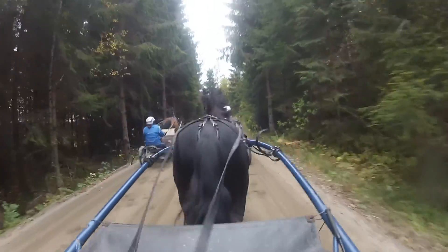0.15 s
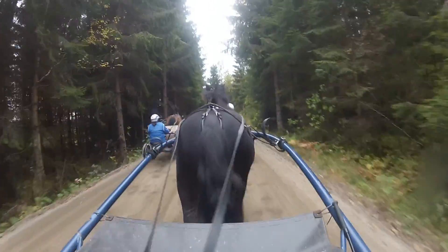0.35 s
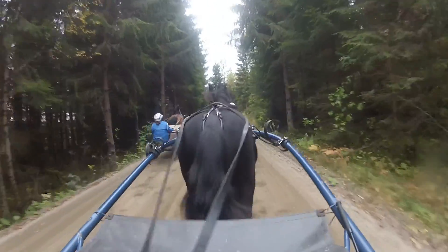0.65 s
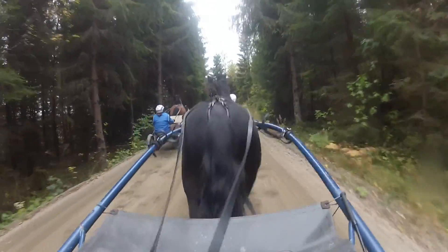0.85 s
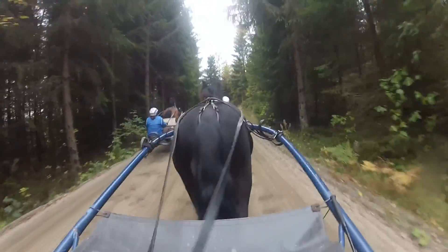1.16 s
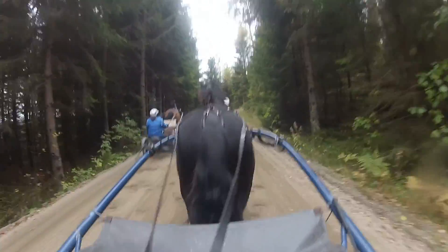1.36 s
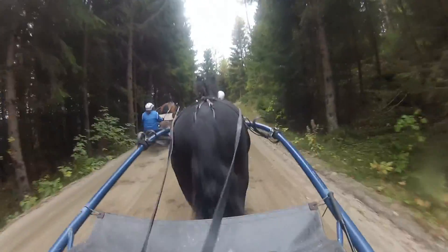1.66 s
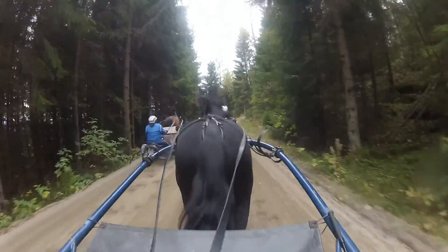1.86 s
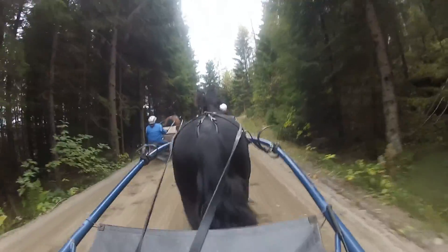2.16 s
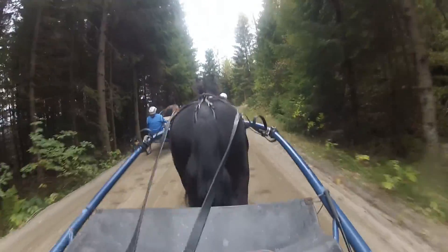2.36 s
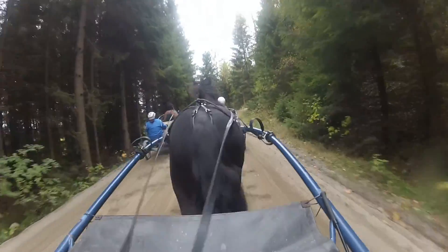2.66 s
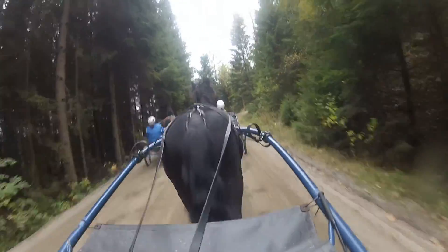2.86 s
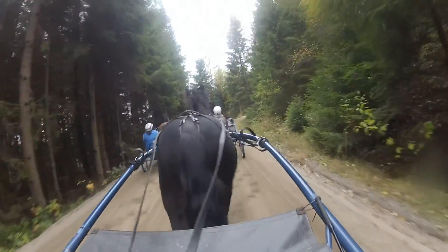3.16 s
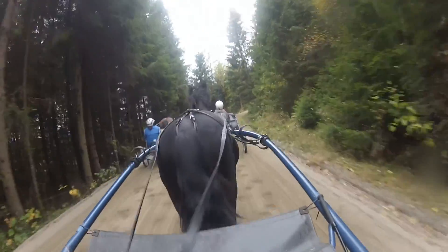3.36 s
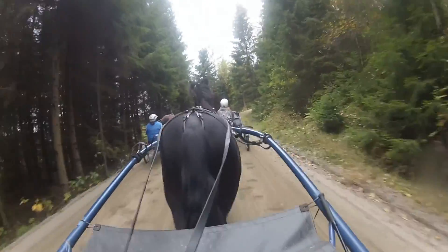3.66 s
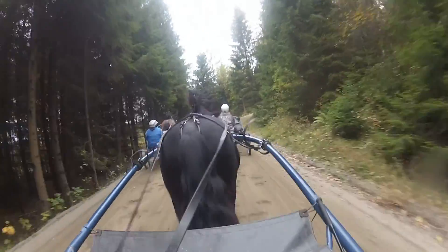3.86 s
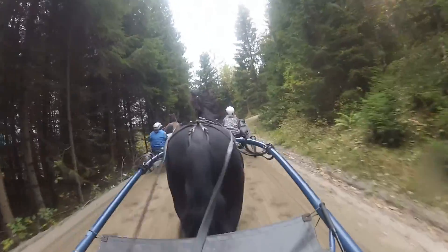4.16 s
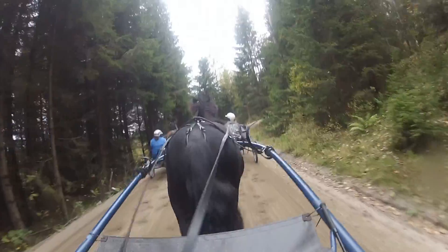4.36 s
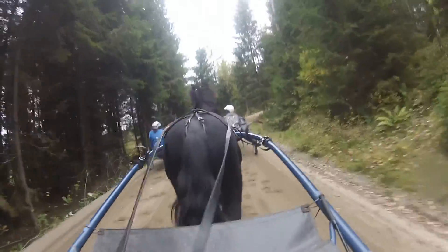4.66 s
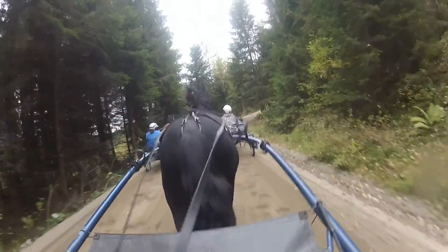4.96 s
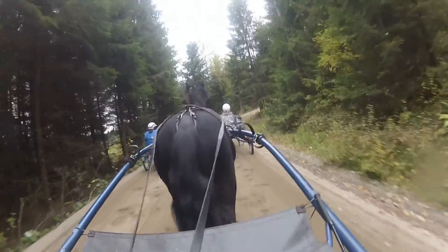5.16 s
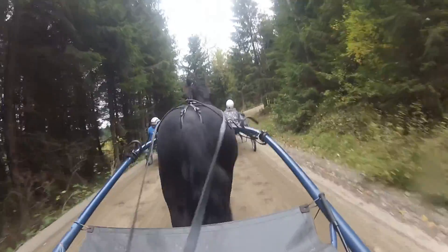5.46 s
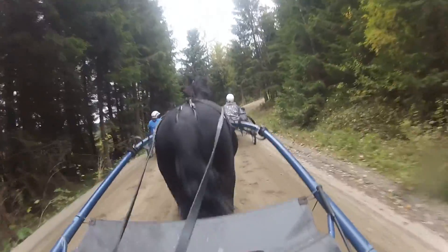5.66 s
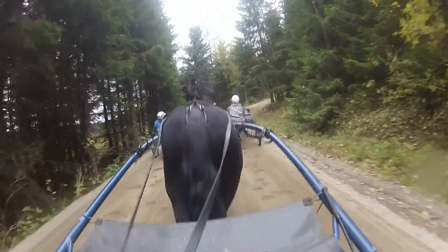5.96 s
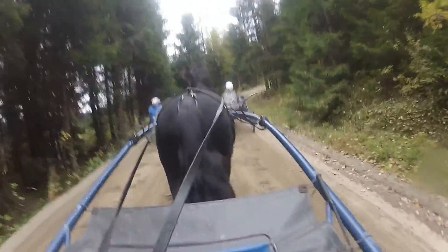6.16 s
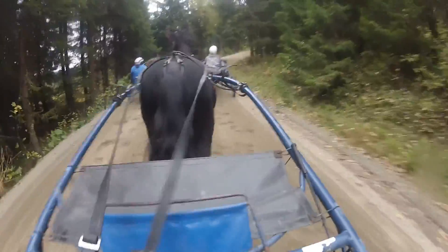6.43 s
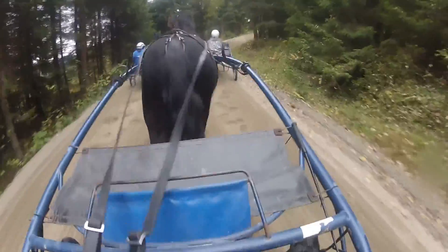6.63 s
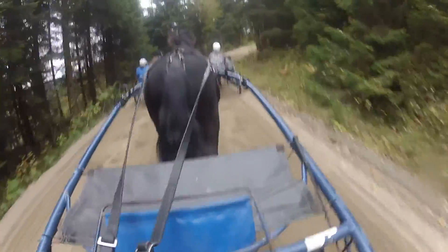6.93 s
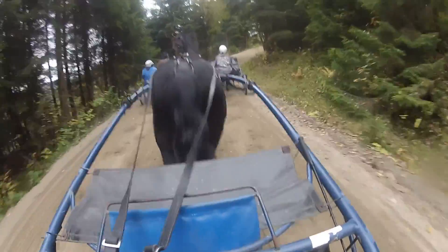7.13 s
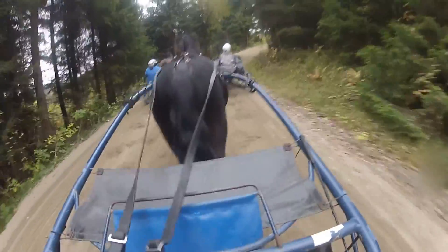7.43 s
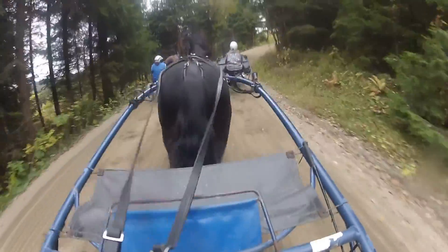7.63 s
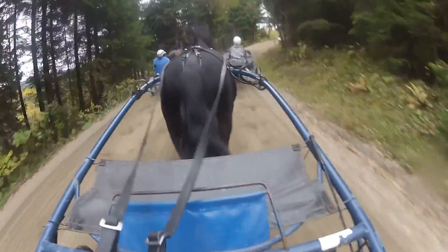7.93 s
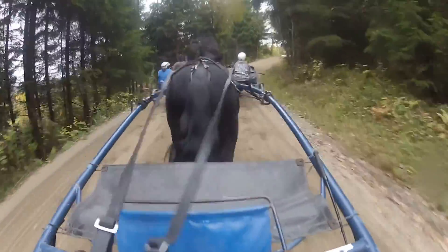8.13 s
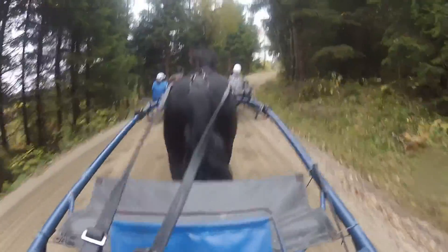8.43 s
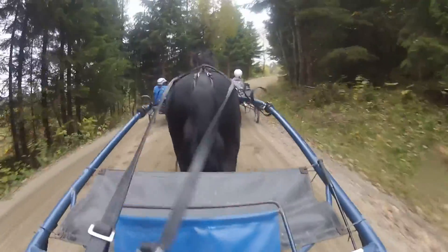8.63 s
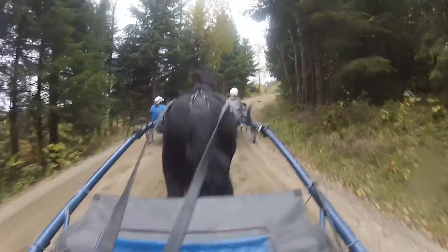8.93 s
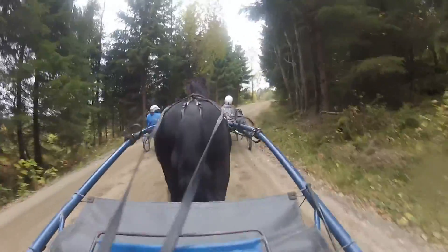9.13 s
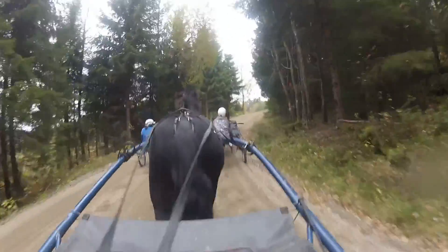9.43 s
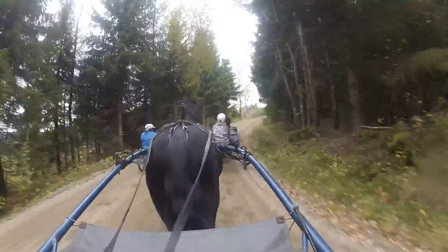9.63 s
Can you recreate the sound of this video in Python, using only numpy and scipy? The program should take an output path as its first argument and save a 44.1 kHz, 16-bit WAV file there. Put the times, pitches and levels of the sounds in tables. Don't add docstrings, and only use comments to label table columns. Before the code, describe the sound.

Close, boxy and coarse sound from inside a camera case on a cart trotting along a forest gravel road. Several dry plastic clicks and clacks each second dominate faint rumble and small stone crunches. Midway the driver shifts: muffled thuds, cloth rubbing and violent knocks. A lull with small chirps follows, then another rub and a sharp hand slap, ending in gritty sleeve shuffles and more clacks.

```python
import sys
import numpy as np
from scipy import signal
from scipy.fft import rfft, irfft, next_fast_len
from scipy.io import wavfile
from scipy.ndimage import uniform_filter1d

SR = 44100
rng = np.random.default_rng(int(sys.argv[2]) if len(sys.argv) > 2 else 0)


def put_to_file(sound):
    columns = np.atleast_2d(sound).T
    safe = np.clip(columns, -1, 1)
    whole_steps = np.round(safe * 32767)
    wavfile.write(sys.argv[1], SR, whole_steps.astype(np.int16))


def nominal_scale(level):
    x = np.asarray(level, float) / 20
    return 10 ** x


N = 431738

STIR_S = 6.15
SCATTER_DB, DETUNE = 1.5, 0.012

# start_s, level_db
SHAKING = [(0.0, -54.5), (3.6, -55.5), (4.42, -56.5), (6.08, -55.5), (6.38, -45.5), (6.81, -54),
           (7.71, -54), (8.64, -51.5), (8.81, -53), (9.32, -53.5), (9.79, -53)]
# start_s, level_db
WEIGHT_SHIFTS = [(6.15, -51), (6.5, -52), (6.75, -55.5), (7.15, -52), (7.5, -59), (7.9, -56), (8.3, -58),
                 (8.85, -59), (9.1, -55.5), (9.5, -53), (9.79, -59.5)]
# pitch_hz, level_db (per Hz)
RUMBLE_COLOUR = [(8, 0), (20, 4), (45, -7), (100, -12.5), (200, -11.5), (280, -18.5), (900, -30.5),
                 (1500, -32.5)]
# pitch_hz, level_db (per Hz)
GRAVEL_COLOUR = [(500, -30), (1000, -9), (1600, -1.5), (2300, 4), (2520, -4.5), (2700, -6), (3100, -3.5),
                 (6000, -9.5)]
# pitch_hz, level_db (per Hz)
SIDE_NOISE_COLOUR = [(12, -5), (25, 16), (70, 11), (200, -4), (900, -15), (2240, -13), (4600, -15),
                     (6000, -27), (9700, -18), (12100, -32), (14300, -17), (16000, -35)]

# start_s, peak_db, length_s, dull_over_bright_db
CRUNCHES = [(0.439, -49.5, 0.02, 4), (0.614, -40.5, 0.018, -0.5), (0.771, -39, 0.025, -3),
            (1.227, -49, 0.02, 3.5), (1.285, -50, 0.014, -7), (1.321, -41.5, 0.018, -5),
            (1.6035, -39.5, 0.018, -8), (1.815, -46.5, 0.013, -0.5), (1.883, -47, 0.011, 6),
            (1.948, -49.5, 0.022, -9), (2.086, -52, 0.017, 5.5), (2.18, -47.5, 0.021, 3),
            (2.875, -53, 0.026, 3), (2.935, -52, 0.017, -1), (3.219, -45, 0.021, 3),
            (3.265, -48.5, 0.02, 4), (4.099, -49, 0.023, 5.5), (4.678, -48, 0.02, -2),
            (4.926, -44.5, 0.021, 1.5), (4.973, -43, 0.017, -1), (5.028, -49, 0.021, 10),
            (5.232, -45.5, 0.018, -3), (5.792, -45, 0.021, 4), (5.879, -48, 0.028, -3),
            (6.973, -43, 0.013, 0), (7.2275, -47.5, 0.016, 2), (7.2715, -43, 0.018, 1),
            (7.498, -47, 0.016, -3), (7.586, -47, 0.027, -1), (7.81, -45.5, 0.017, 0),
            (7.844, -41, 0.017, 2), (7.907, -53.5, 0.02, 5), (8.099, -47, 0.019, -8), (8.139, -50, 0.02, 0),
            (8.365, -47, 0.016, -1), (8.405, -46, 0.018, -1), (8.64, -51, 0.025, -3),
            (8.695, -44.5, 0.037, 5), (8.9101, -49, 0.017, 3), (8.962, -47.5, 0.018, -1),
            (9.036, -40, 0.018, -6), (9.202, -43, 0.017, 7), (9.26, -46, 0.017, 1),
            (9.6794, -47.5, 0.016, 6)]
# pitch_hz, width_hz, level_db
CRUNCH_BODY = [(1700, 290, -4), (2236, 470, 1.5)]
# pitch_hz, width_hz, level_db
GRIT_BODY = [(3300, 1760, 0.55), (4404, 240, 3.3), (5320, 550, 2.9)]

# start_s, length_s, pitch_hz, level_db
SQUEAKS = [
    (5.614, 0.095, 1560, -62.5),
    (7.501, 0.023, 3320, -56),
    (8.125, 0.013, 2400, -50),
    (6.744, .008, 2400, -56),
    (6.993, 0.014, 2350, -54),
    (7.191, 0.0088, 2370, -54),
    (8.32, 0.015, 2400, -47.5),
    (8.545, .07, 990, -61.5),
]

# start_s, length_s, level_db
SHIVERS = [(.059, 0.03, -49), (.093, 0.026, -47.5), (.357, 0.012, -42), (.378, 0.069, -52),
           (.439, 0.03, -47), (.645, 0.028, -51.5), (.696, 0.072, -50.5), (.929, 0.0086, -41),
           (1.242, 0.018, -50), (.948, .016, -56), (4.055, 0.025, -57), (5.826, 0.023, -47.5),
           (1.492, 0.056, -49.5), (2.34, 0.13, -55.5), (2.677, 0.047, -46.5), (2.975, 0.02, -43),
           (3.018, 0.024, -50), (3.048, 0.011, -42), (3.5, 0.062, -53), (3.581, .014, -40),
           (3.762, 0.018, -49), (3.545, 0.029, -53), (1.486, .01, -47), (.985, .015, -57),
           (3.95, 0.047, -59.5), (3.791, 0.085, -46), (4.58, 0.033, -56), (4.645, 0.035, -55),
           (4.672, 0.088, -50.5), (4.775, 0.012, -60), (5.577, 0.03, -51), (5.795, 0.03, -52),
           (6.075, 0.032, -41)]
# start_s, length_s, level_db
DRAGS = [(6.16, 0.071, -52), (6.223, 0.085, -44), (6.293, 0.033, -45), (6.325, 0.052, -41),
         (6.37, 0.053, -42), (6.482, 0.09, -54), (6.557, .046, -46), (6.576, .024, -53), (6.606, .016, -52),
         (6.741, 0.088, -55.5), (8.02, 0.67, -57), (8.225, 0.039, -50.5), (8.258, 0.087, -41),
         (8.383, 0.19, -38), (8.489, 0.044, -36.5), (8.519, 0.015, -25.5), (8.595, 0.068, -47),
         (8.672, 0.089, -42.5), (8.74, 0.099, -47.5), (9.4, 0.015, -51), (9.54, 0.018, -50),
         (9.72, 0.031, -54), (8.848, 0.072, -53), (8.93, .9, -62), (9.57, .035, -59), (9.765, .03, -52),
         (8.655, .025, -55)]
# start_s, length_s, level_db
SHUFFLES = [(6.622, 0.076, -51), (6.948, 0.014, -50.5), (6.452, 0.026, -36.5), (8.75, 0.084, -49),
            (7.6, .07, -58), (12, 0.012, -48), (9.59, .1, -75), (13, 0.083, -53), (7.432, 0.0076, -52),
            (8.965, 0.051, -50.5), (9.024, .036, -43), (9.085, .03, -54), (9.11, .05, -47),
            (9.168, .06, -45), (9.244, .03, -50), (9.283, .042, -53), (9.374, .062, -45),
            (9.444, 0.073, -47.5), (9.513, 0.062, -45), (9.7, 0.071, -50)]
# pitch_hz, width_hz, level_db
JIGGLE_BODY = [(1500, 900, -9), (2150, 600, -1), (2500, 300, -2)]
# pitch_hz, width_hz, level_db
RUB_BODY = [(1202, 150, 18.5), (1560, 410, 9.5), (1890, 560, 23), (2400, 110, -0.5), (3646, 110, 15.5),
            (3090, 320, 12.5)]
# pitch_hz, width_hz, level_db
SLEEVE_GRIT = [(3520, 950, 3), (4400, 460, -0.5), (5320, 460, 0.5)]
# pitch_hz, width_hz, level_db
SHELL_BOOM = [(195, 40, -1.1), (94, 104, -0.91)]

# start_s, peak_db, pitch_hz
THUDS = [(0.734, -36, 175), (.931, -38.5, 224), (5.481, -45, 200), (6.186, -36, 165), (6.2126, -25, 150),
         (6.229, -26, 152), (6.249, -34, 148), (6.285, -37, 178), (6.341, -32, 160), (6.391, -33, 193),
         (6.426, -17, 177), (6.4574, -16.5, 165), (6.548, -31, 208), (6.644, -29, 170), (6.941, -27.5, 170),
         (7.234, -35.5, 170), (7.459, -40, 210), (7.611, -30.5, 151), (7.953, -36.5, 173),
         (8.018, -34, 119), (8.263, -36, 184), (8.384, -32, 126), (8.52, -18.5, 195), (8.538, -27, 190),
         (8.594, -38, 147), (8.715, -28, 138), (9.344, -37.5, 140.2), (9.441, -32.5, 154),
         (9.543, -38, 191), (8.847, -43, 130), (9.088, -43, 149), (9.169, -44, 149.4), (9.697, -43, 140),
         (6.422, -28, 110), (6.459, -24, 105), (6.211, -33, 106), (7.705, -43, 110), (7.76, -42, 130),
         (8.3, -39, 185), (6.31, -37, 150)]
# start_s, peak_db
BONKS = [(6.2, -38), (7.5, -57), (6.423, -32), (6.459, -27), (6.644, -36.5), (6.941, -37), (7.235, -51),
         (8.716, -42), (8.519, -28), (8.524, -26), (6.55, -36), (1.2165, -44.5), (1.7455, -43),
         (3.583, -40)]
# pitch_hz, level_db, decay_s (to -60 dB)
BONK_MODES = [(626, 4.5, 0.009), (766, -1.5, 0.013)]

# start_s, peak_db, low_over_high_db
KNOCKS = [(6.2001, -28.5, -2.5), (6.2283, -27.5, -7), (6.2807, -29.5, -10), (6.342, -34, -11),
          (6.3576, -33, -19), (6.55, -12, -6.5), (6.63, -42, 2), (7.927, -49.5, 2.5), (7.969, -53, 0),
          (8.019, -44, -12), (6.6176, -38.5, 1.5), (6.6438, -25.5, -5.5), (6.6775, -16.5, -8),
          (6.6846, -23, -2), (6.941, -35, 4), (7.235, -54.5, 12.5), (7.6093, -31, -41), (7.952, -28, -3),
          (8.61, -34, -21), (8.712, -37, -20), (8.718, -41, -17), (8.9961, -33.5, -14), (9.4015, -33, -3),
          (9.487, -41, -17)]
# pitch_hz, level_db, decay_s
KNOCK_MODES = [(900, -1, 0.0045), (1242, 13.5, 0.0097), (1560, -6, 0.024), (1855, 12, 0.0086),
               (2220, 5, 0.0046), (3100, -23, 0.0092)]
# start_s, peak_db, low_over_high_db
RAPS = [
    (6.4231, -14.5, -9),
    (6.4241, -9, -4),
    (6.4592, -16, 0),
]
# pitch_hz, level_db, decay_s
RAP_MODES = [(1216, 9.5, 0.011), (1930, 10, 0.0077), (2230, 5.5, 0.0076), (3100, -8, 0.0056)]
# start_s, peak_db, low_over_high_db
SLAPS = [
    (8.5188, -11.5, -2),
    (8.5215, -19, 4),
    (8.5238, -8, 0.5),
    (8.5263, -10, -8),
    (8.5298, -28, 2),
    (8.5343, -21, 0),
    (8.5375, -18.5, -8),
]
# pitch_hz, level_db, decay_s
SLAP_MODES = [(1180, 2.5, 0.022), (1330, 7.5, 0.013), (1560, 6, 0.011), (1686, 5, .01), (1880, -10, .01),
              (3130, -11, 0.0098)]

# start_s, peak_db
TOCKS = [(0.7366, -40.5), (1.497, -26), (1.5674, -42), (1.716, -22), (1.995, -40), (2.156, -27.5),
         (2.273, -29), (2.3823, -46), (2.985, -22.5), (3.101, -37.5), (3.393, -28), (3.5822, -23.5),
         (3.7061, -32), (5.894, -33.5), (5.748, -50.5)]
# pitch_hz, level_db, decay_s
TOCK_MODES = [(200.3, -5, 0.012), (834, -29, 0.0079), (1170, 14.5, 0.018), (1860, 5.5, 0.028),
              (2150, -75, 0.0027), (3040, -19, 0.015)]

# start_s, peak_db
TICKS = [(.445, -42), (1.2108, -37.5), (1.2165, -35.5), (7.0855, -44), (9.49, -37), (.271, -62),
         (3.588, -37), (4.424, -45), (1.7424, -29.5), (2.1679, -37), (2.288, -34), (2.7437, -38),
         (2.896, -42), (2.9652, -29.5), (3.4175, -30.5), (3.5312, -32.5), (3.8541, -29.5), (5.4756, -34.5),
         (5.7887, -33.5), (6.2096, -33), (6.3923, -25.5), (6.424, -21), (6.46, -24), (6.6862, -32),
         (7.081, -32.5), (9.382, -46), (9.7274, -43)]
# start_s, peak_db
DOUBLE_TICKS = [
    (0.1402, -28),
    (0.3613, -29),
    (0.775, -40),
    (0.9302, -27.5),
    (2.4093, -33),
    (2.6158, -33),
    (4.6216, -31.5),
    (6.0762, -30.5),
    (7.46, -31),
    (9.043, -46),
]
# pitch_hz, level_db, decay_s
TICK_MODES = [(261, -16.5, 0.0096), (610, 0, 0.0023), (1460, -0.5, 0.0036), (2130, 5.5, 0.0031),
              (2744, -6, 0.0065), (3356, -0.5, 0.0054), (4010, -7.5, 0.0031)]

# start_s, peak_db, flight_s
JOLTS = [(0.203, -22, 0.013), (0.4995, -29.5, 0.0091), (0.811, -28.5, .0095), (1.1183, -27.5, .0061),
         (1.374, -21, 0.013), (1.5875, -21, 0.014), (1.918, -25.5, 0.0099), (2.213, -23.5, 0.011),
         (2.3202, -22, 0.012), (2.53, -26.5, 0.011), (2.7771, -23, .012), (2.9685, -36, 0.0061),
         (3.4717, -26, .0139), (3.6464, -30, 0.0074), (3.8528, -43, 0.011), (4.1456, -28.5, 0.0094),
         (4.4006, -27, 0.0085), (4.6962, -23, 0.014), (5.0345, -39, 0.013), (5.3124, -29, 0.0078),
         (5.6666, -26.5, .0124), (6.0005, -27.5, .0109), (6.0784, -48, 0.0052), (8.3172, -36, 0.009),
         (8.8076, -43, 0.0057), (9.0592, -24, 0.014), (9.278, -28, .0148), (9.5355, -24, 0.011)]
# start_s, peak_db
NUDGES = [(0.0633, -39), (0.0997, -39), (0.6177, -44), (.727, -28), (1.0387, -32.5), (1.5153, -29.5),
          (2.1317, -26), (2.3548, -37), (2.6816, -26.5), (2.7102, -36.5), (3.047, -32.5), (3.799, -34.5),
          (4.93, -45), (5.831, -39.5), (6.1626, -32.5), (6.167, -25), (6.469, -40), (6.6598, -41),
          (7.055, -24.5), (7.236, -44), (7.439, -28), (7.8496, -45), (8.605, -42), (8.616, -41),
          (8.619, -38), (9.189, -44), (9.2017, -39), (9.3945, -40), (9.738, -34)]
# pitch_hz, level_db, decay_s
CLACK_MODES = [(218, -7, 0.01), (433, -6.5, 0.0054), (1320, 9, 0.0028), (1861, 5.5, 0.0093),
               (2220, 8, 0.0055), (2480, -8, 0.03), (3120, 4, 0.003), (4150, -7, 0.0059),
               (4950, -8, 0.0062)]


def level(x, db):
    return x * nominal_scale(db) / np.sqrt(np.mean(x ** 2))


def noise():
    return rng.standard_normal(N)


def walk(rate):
    k = int(SR / rate)
    held = np.repeat(rng.standard_normal(N // k + 1), k)
    return 1.58 * uniform_filter1d(uniform_filter1d(held, k), k)[:N]


def low_pass(x, order, hz):
    return signal.sosfilt(signal.butter(order, hz, fs=SR, output="sos"), x)


def coloured(spectrum, x):
    hz, db = np.transpose(spectrum)
    size = next_fast_len(N)
    f = np.maximum(np.fft.rfftfreq(size, 1 / SR), 1)
    gain = nominal_scale(np.interp(np.log(f), np.log(hz), db, left=-60, right=-60))
    return level(irfft(rfft(x, size) * gain, size)[:N], 0)


def grains(per_s, spread_db):
    hit = rng.random(N) < per_s / SR
    size_db = spread_db * np.minimum(rng.exponential(size=N), 4)
    return level(hit * noise() * nominal_scale(size_db), 0)


def through(x, body):
    out = 0
    for hz, width, db in body:
        b, a = signal.iirpeak(hz, hz / width, SR)
        out = out + nominal_scale(db) * signal.lfilter(b, a, signal.lfilter(b, a, x))
    return level(out, 0)


def add(out, x, s):
    i = max(int(s * SR), 0)
    out[i:i + len(x)] += x[:N - i]
    return out


def strike(out, s, gains, hz, t60, push_s):
    t = np.arange(int(0.05 * SR))[:, None] / SR
    decay = np.exp(-np.log(1000) * t / t60)
    ring = (gains * decay * np.sin(2 * np.pi * hz * t)).sum(axis=1)
    push = np.sin(np.pi / 2 * np.clip(t[:, 0] / push_s, 0, 1)) ** 2
    return add(out, ring * push, s)


def rattle(events, modes, scatter_db, detune, push_s, trim_db, again=()):
    hz, db, t60 = np.transpose(modes)
    low = (hz > 500) & (hz < 1500)
    out = np.zeros(N)
    chance = rng.standard_normal((len(events), 2, len(hz)))
    for (s, peak_db, *tilt_db), (louder, sharper) in zip(events, chance):
        gains = nominal_scale(peak_db + trim_db + db + scatter_db * louder + sum(tilt_db) * low)
        pitches = hz * (1 + detune * sharper)
        for delay, gain in ((0, -1), *again):
            out = strike(out, s + delay, gain * gains, pitches, t60, push_s)
    return out


def road():
    t = np.arange(N) / SR
    shake_db = np.interp(t, *np.transpose(SHAKING))
    rumble = coloured(RUMBLE_COLOUR, noise() * nominal_scale(1.5 * walk(24)))
    stones = coloured(GRAVEL_COLOUR, grains(3000, 3.5) + noise())
    dull = signal.sosfiltfilt(signal.butter(4, 2650, fs=SR, output="sos"), stones)
    bright = stones - dull
    gravel = dull * nominal_scale(1.8 * walk(45) + 0.8 * walk(12))
    gravel = gravel + bright * nominal_scale(1.3 * walk(40) + 1.3 * walk(12))
    sway = through(noise() * nominal_scale(4.2 * walk(11)), [(85.0, 67, 0)])
    sway = (t > STIR_S) * sway * nominal_scale(np.interp(t, *np.transpose(WEIGHT_SHIFTS)))
    return sway + rumble * nominal_scale(shake_db + 2.5) + gravel * nominal_scale(shake_db - 6.5)


def crunches():
    attack_s, release_s, trim_db = 0.0021, 0.01, -4.5
    dull, grit = np.zeros(N), np.zeros(N)
    for s, db, length, dull_db in CRUNCHES:
        t = np.arange(int((length + 0.03) * SR)) / SR
        crumble = np.exp(-0.7 * t / length - np.maximum(t - length, 0) / release_s)
        shape = np.clip(t / attack_s, 0, 1) * crumble
        grit = add(grit, nominal_scale(db + trim_db) * shape, s - 0.001)
        dull = add(dull, nominal_scale(db + trim_db + dull_db) * shape, s - 0.001)
    chips = grains(9000, 4.2)
    return grit * through(chips, GRIT_BODY) + dull * through(chips, CRUNCH_BODY)


def squeaks():
    out = np.zeros(N)
    for s, length, hz, db in SQUEAKS:
        t = np.arange(int(length * SR)) / SR
        swell = np.sin(np.pi * t / length) ** 0.5
        out = add(out, nominal_scale(db + 6.0) * swell * np.sin(2 * np.pi * hz * t), s)
    return out


def landings():
    rows = []
    for s, _, flight in JOLTS:
        rows.append((s + flight, -31 + 20 * np.log10(flight / 0.011), flight))
    return rows


def rubbings():
    shiver_grit_db, drag_grit_db, shuffle_grit_db = -7, -39, -8
    quick_s = 0.007
    rows = []
    for s, db, _ in landings():
        if s < STIR_S:
            rows.append((s - 0.002, 0.016, db - 13, shiver_grit_db, quick_s))
    rows += [(*row, shiver_grit_db, quick_s) for row in SHIVERS]
    rows += [(*row, drag_grit_db, quick_s) for row in DRAGS]
    rows += [(s, length, db, shuffle_grit_db, 0.18 * length) for s, length, db in SHUFFLES]
    return rows


def scuffs():
    dull, grit = np.zeros(N), np.zeros(N)
    for s, length, db, grit_db, attack_s in rubbings():
        t = np.arange(int((length + 0.03) * SR)) / SR
        fade = np.exp(-0.8 * t / length) if s < STIR_S else 1
        release = np.exp(-np.maximum(t - 0.83 * length, 0) / 0.0042)
        shape = fade * np.clip(t / attack_s, 0, 1) * release
        dull = add(dull, nominal_scale(db) * shape, s)
        grit = add(grit, nominal_scale(db + grit_db) * shape, s)
    cloth = np.arange(N) / SR > STIR_S
    fibres = level(noise() * nominal_scale(2.3 * walk(150)), 0)
    slips = np.where(cloth, fibres, grains(6000, 4.9))
    body = np.where(cloth, through(slips, RUB_BODY), through(slips, JIGGLE_BODY))
    sand = np.where(cloth, level(noise() * nominal_scale(2.6 * walk(90)), 0), slips)
    bright = np.where(cloth, through(sand, SLEEVE_GRIT), through(sand, GRIT_BODY))
    boom = nominal_scale(-11.0) * dull * cloth * through(slips, SHELL_BOOM)
    return dull * body + grit * bright + boom


def thuds():
    out = np.zeros(N)
    for s, db, hz in THUDS:
        sway = 0.23 * (180 / hz) ** 3
        gains = -nominal_scale(db + 8.0) * np.array([1, sway])
        out = strike(out, s - 0.001, gains, hz * np.array([1, 0.48]), np.array([0.03, 0.05]), 0.0042)
    return out


def bonks():
    return rattle(BONKS, BONK_MODES, SCATTER_DB, 4 * DETUNE, 0.00083, 3.2)


def knocks():
    padded = rattle(KNOCKS, KNOCK_MODES, SCATTER_DB, DETUNE, 0.0012, -0.16)
    padded = low_pass(padded, 6, 2500)
    raps = rattle(RAPS, RAP_MODES, SCATTER_DB / 2, DETUNE / 4, 0.00079, 0)
    slaps = rattle(SLAPS, SLAP_MODES, SCATTER_DB / 2, DETUNE / 4, 0.001, -2.0)
    shell = signal.butter(8, 1035, "highpass", fs=SR, output="sos")
    return signal.sosfilt(shell, padded + raps + slaps)


def tocks():
    events = [(s, db, -12.5) for s, db in TOCKS]
    return rattle(events, TOCK_MODES, SCATTER_DB / 2, DETUNE / 4, 0.0016, -1.1)


def ticks():
    seconds = [(s + 0.0035, db - 2) for s, db in DOUBLE_TICKS]
    return -rattle(TICKS + DOUBLE_TICKS + seconds, TICK_MODES, SCATTER_DB, DETUNE, 0.00061, 10.0)


def mount_contacts():
    rows = [(s, db) for s, db, _ in JOLTS] + NUDGES
    for s, db, flight in landings():
        rows.append((s, db))
        if flight > 0.0137:
            s, db = s + flight / 2, db - 6
            rows.append((s, db))
        rows.append((s + 0.0042, db - 5))
    return rows


def mount():
    rebound = (0.00108, 1.25)
    return rattle(mount_contacts(), CLACK_MODES, SCATTER_DB, 2 * DETUNE, 0.00028, -7.5, again=[rebound])


def scene():
    mono = road() + crunches() + squeaks() + scuffs() + thuds() + bonks()
    mono = mono + knocks() + tocks() + ticks() + mount()
    return np.array([mono, mono])


def hold_in_steps(x):
    held_rate, steps = 12000, 4
    x = low_pass(x, 16, 5880)
    low = signal.resample_poly(x, held_rate // 300, SR // 300, axis=1)
    held = np.repeat(low, steps, axis=1)
    out = signal.resample_poly(held, SR // 300, held_rate * steps // 300, axis=1)[:, :N]
    return np.pad(out, ((0, 0), (0, N - out.shape[1])))


def side_noise():
    side = coloured(SIDE_NOISE_COLOUR, noise() * nominal_scale(7.1 * walk(20))) * nominal_scale(-64.5)
    return side * np.array([[1], [-1]])


def thin_treble(x):
    top_hz = 15400
    band = signal.butter(6, (11300, 12900), "bandpass", fs=SR, output="sos")
    x = x - signal.sosfiltfilt(band, x) * np.clip(1.5 * walk(60) - 0.5, 0, 1)
    x = signal.sosfilt(signal.ellip(5, 0.3, 31, top_hz, fs=SR, output="sos"), x)
    return low_pass(x, 20, 1.07 * top_hz)


def top_cut(x):
    return signal.sosfilt(signal.butter(12, 16640, fs=SR, output="sos"), x)


def record(dry):
    ceiling = 0.95
    dry = ceiling * np.tanh(dry / ceiling)
    out = hold_in_steps(dry) + side_noise()
    out = thin_treble(out)
    return top_cut(out)


dry = scene()
out = record(dry)
put_to_file(out)
```